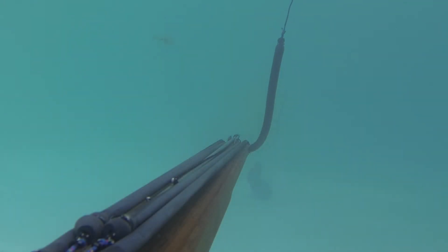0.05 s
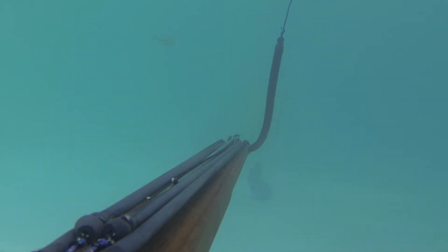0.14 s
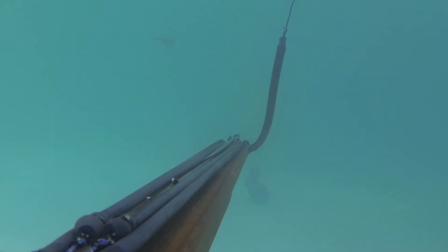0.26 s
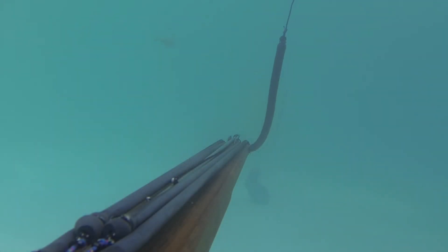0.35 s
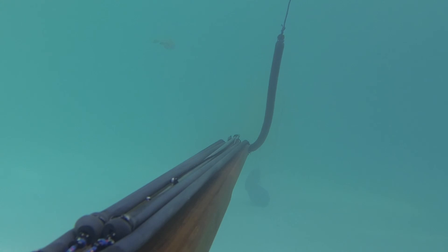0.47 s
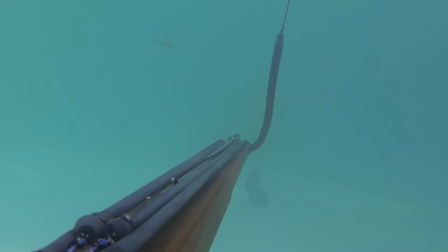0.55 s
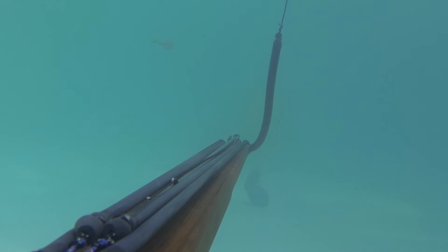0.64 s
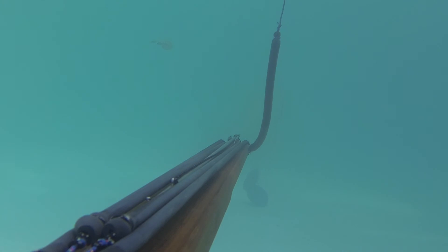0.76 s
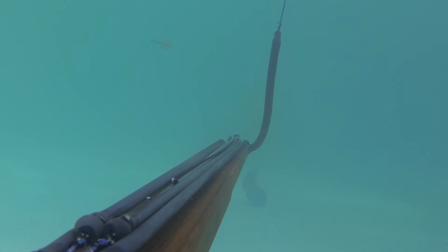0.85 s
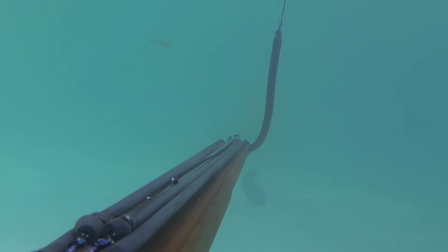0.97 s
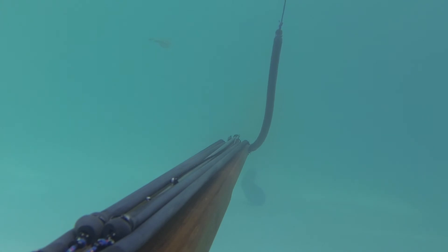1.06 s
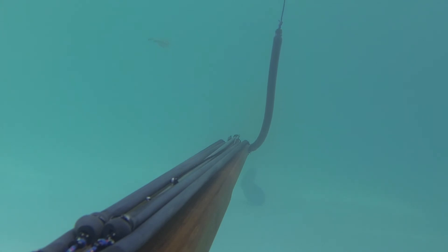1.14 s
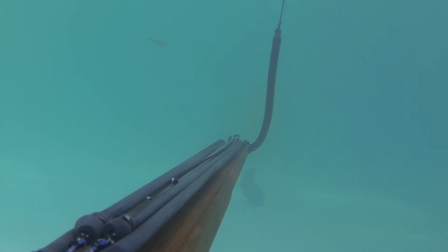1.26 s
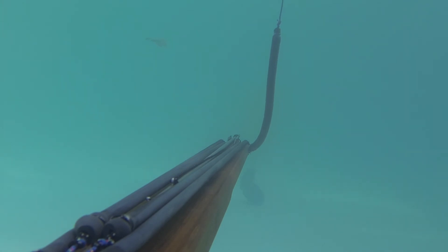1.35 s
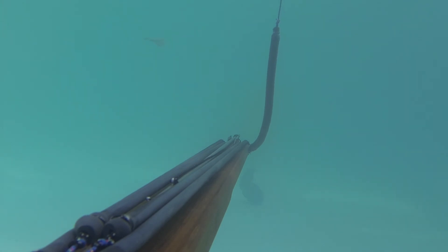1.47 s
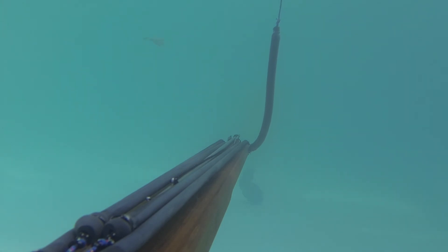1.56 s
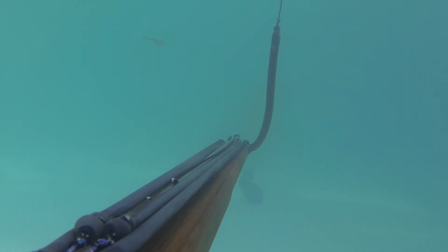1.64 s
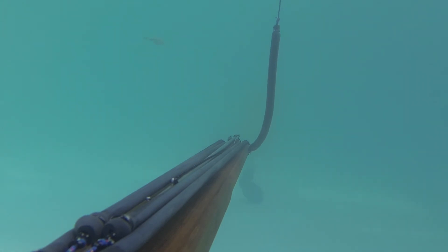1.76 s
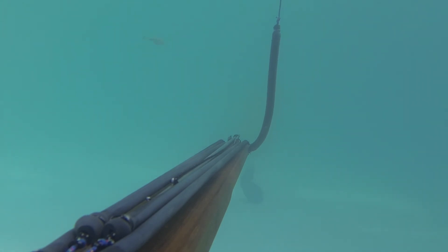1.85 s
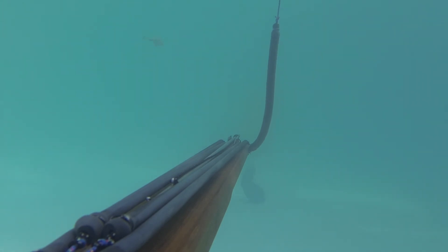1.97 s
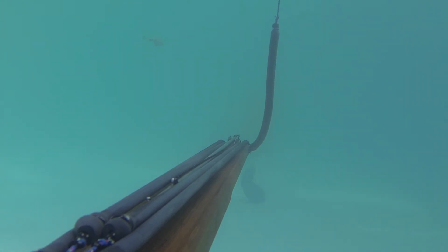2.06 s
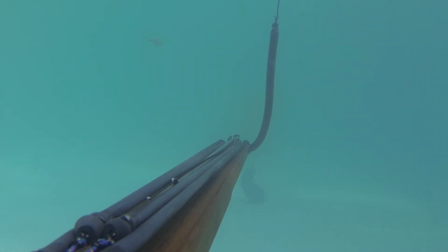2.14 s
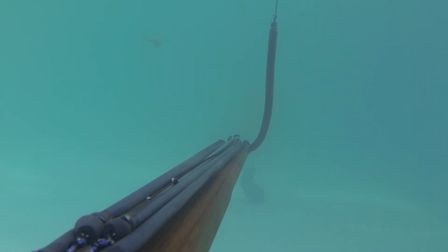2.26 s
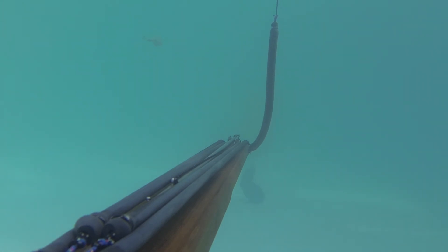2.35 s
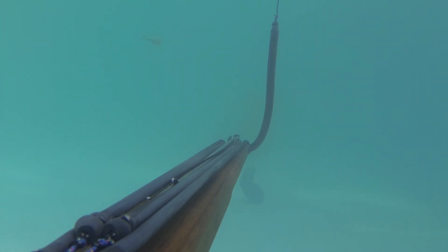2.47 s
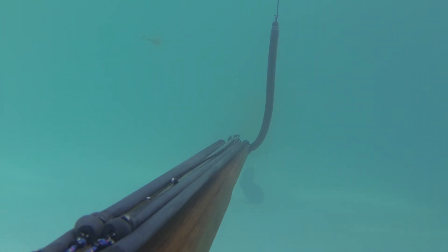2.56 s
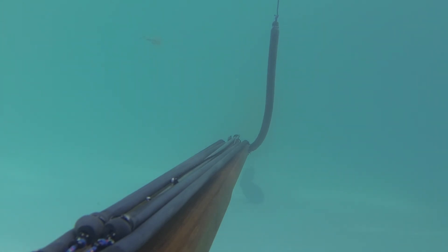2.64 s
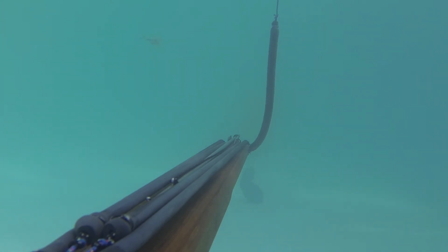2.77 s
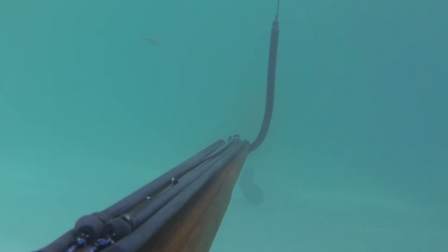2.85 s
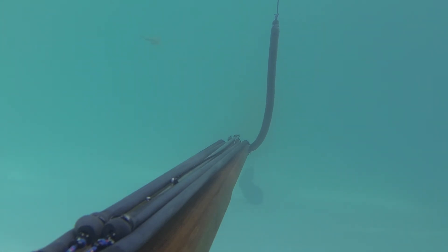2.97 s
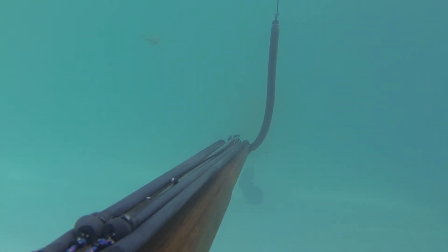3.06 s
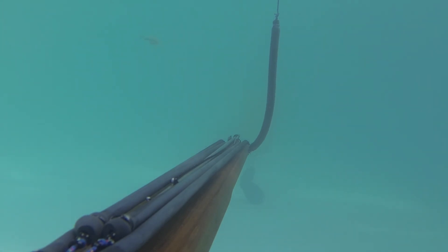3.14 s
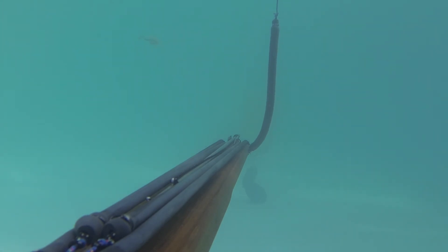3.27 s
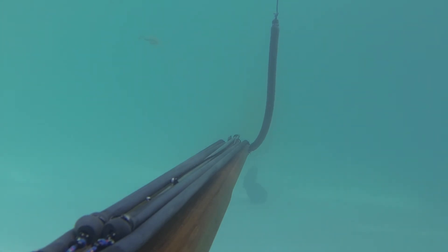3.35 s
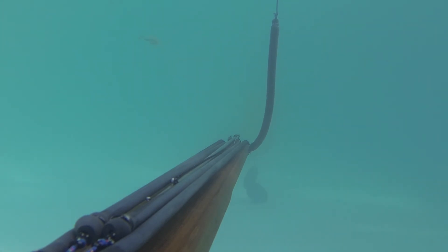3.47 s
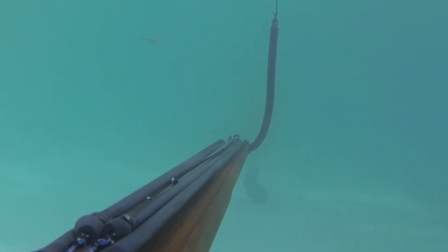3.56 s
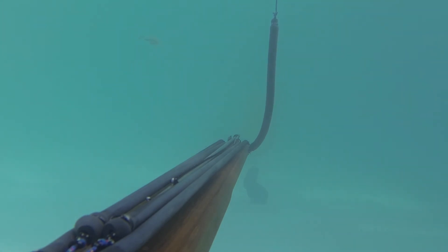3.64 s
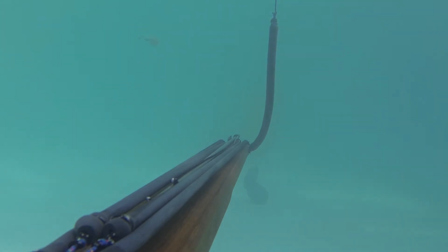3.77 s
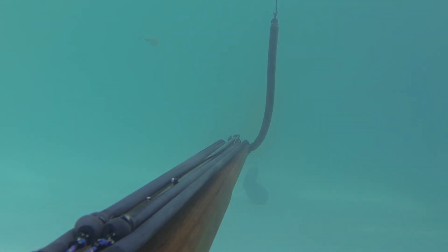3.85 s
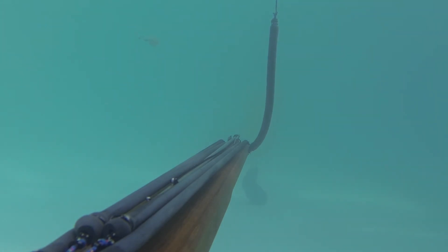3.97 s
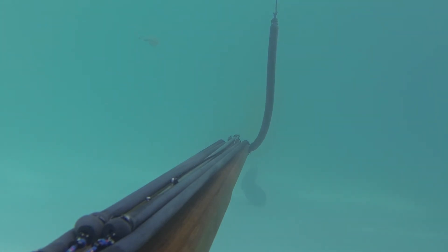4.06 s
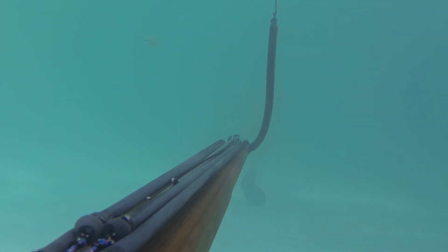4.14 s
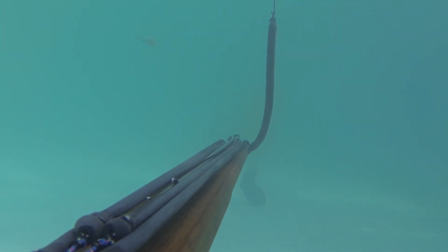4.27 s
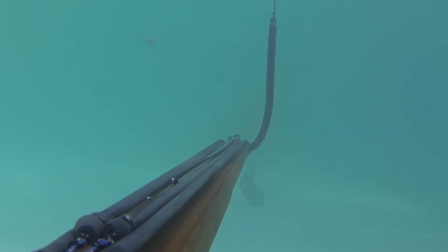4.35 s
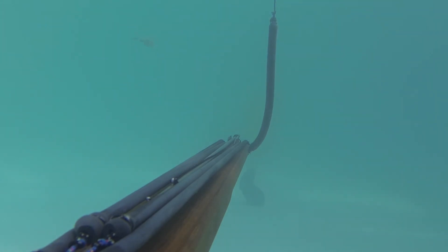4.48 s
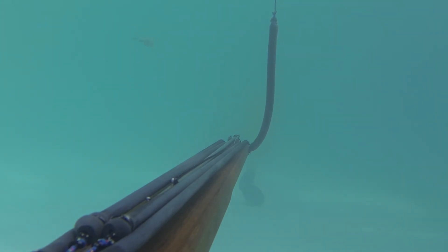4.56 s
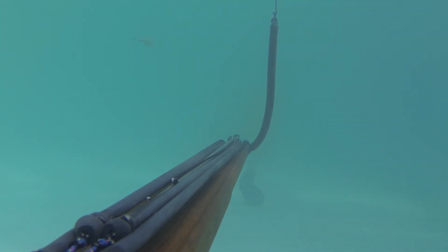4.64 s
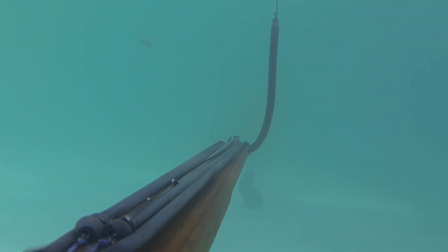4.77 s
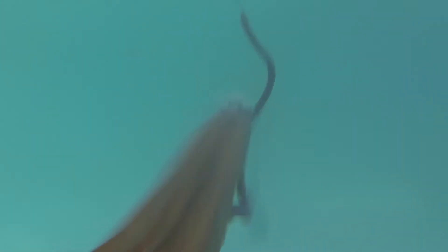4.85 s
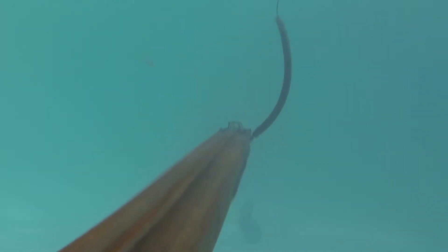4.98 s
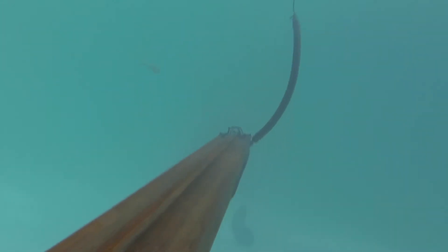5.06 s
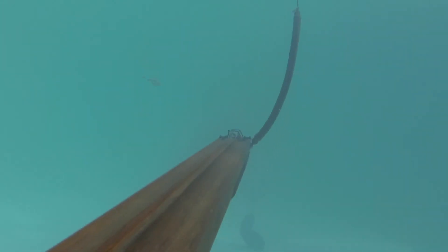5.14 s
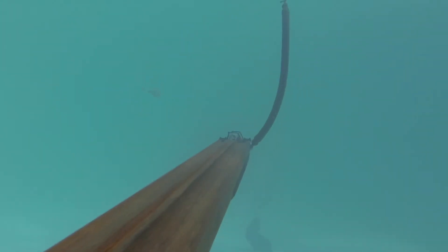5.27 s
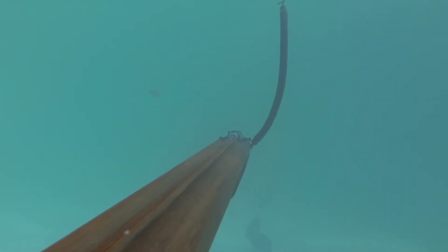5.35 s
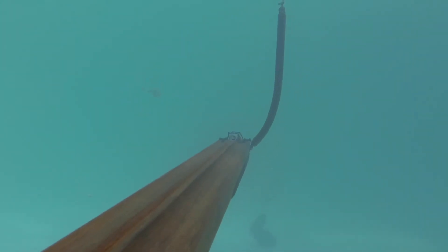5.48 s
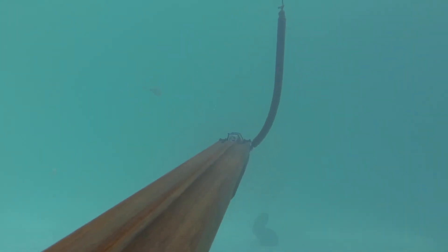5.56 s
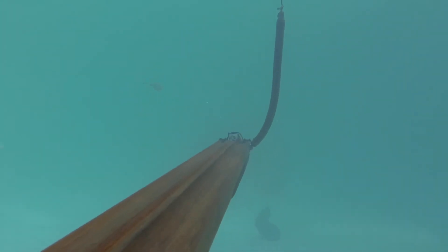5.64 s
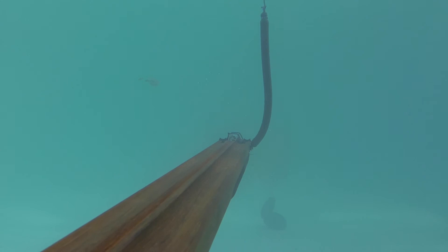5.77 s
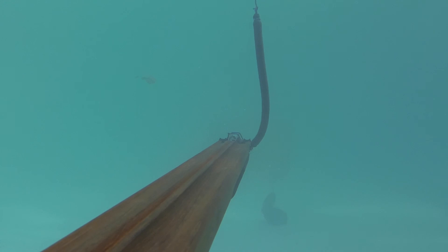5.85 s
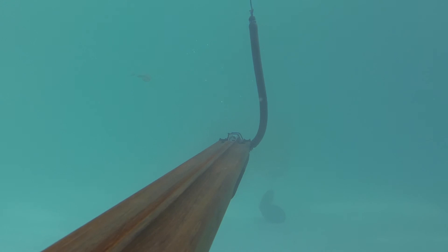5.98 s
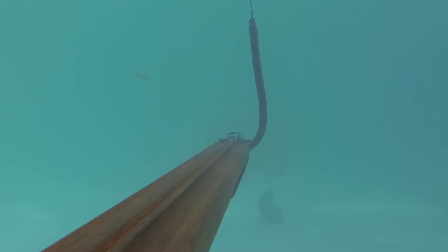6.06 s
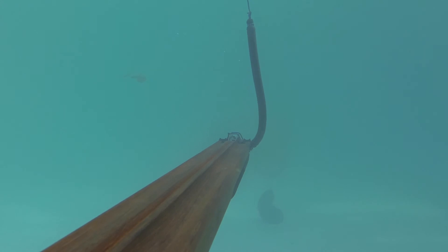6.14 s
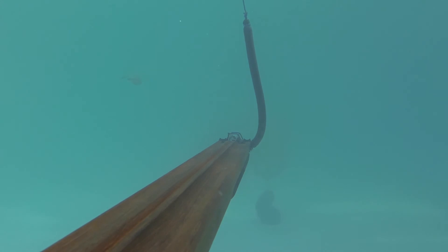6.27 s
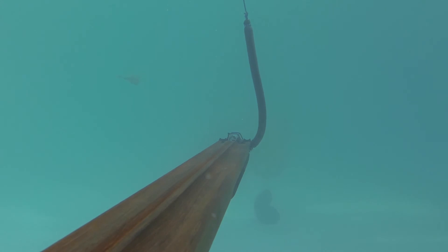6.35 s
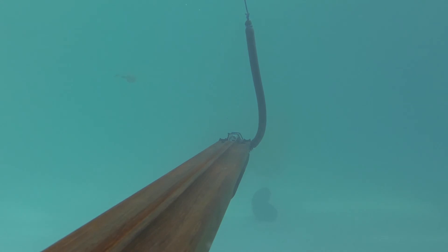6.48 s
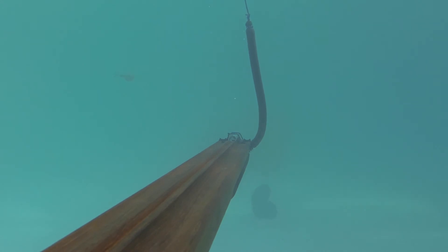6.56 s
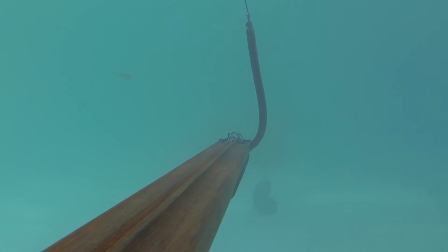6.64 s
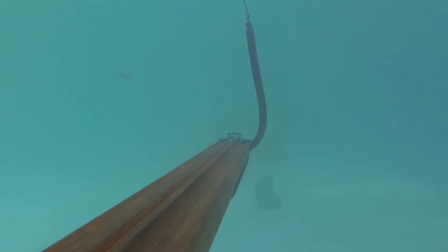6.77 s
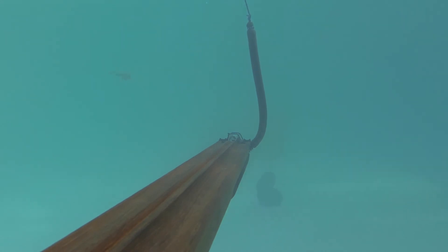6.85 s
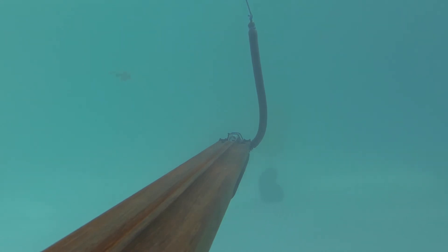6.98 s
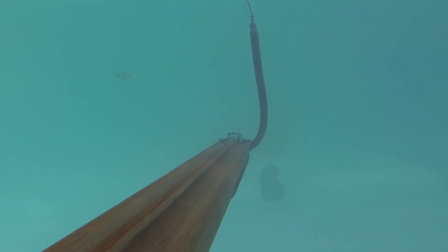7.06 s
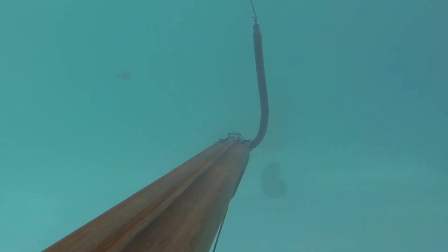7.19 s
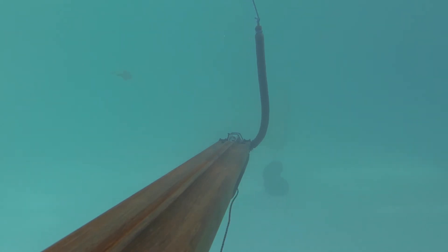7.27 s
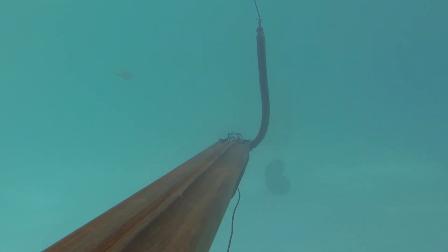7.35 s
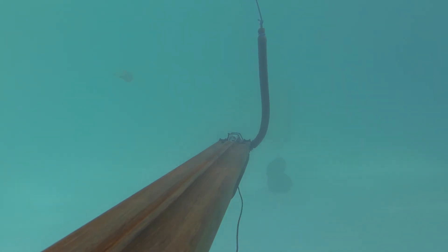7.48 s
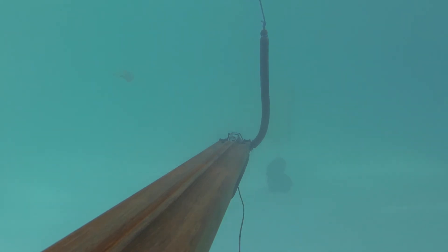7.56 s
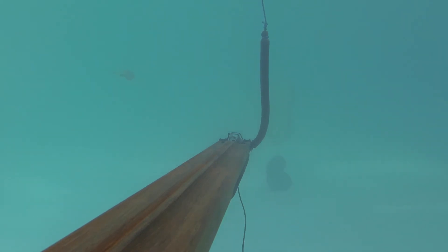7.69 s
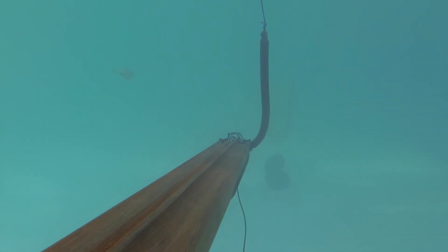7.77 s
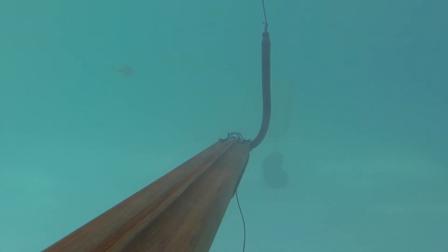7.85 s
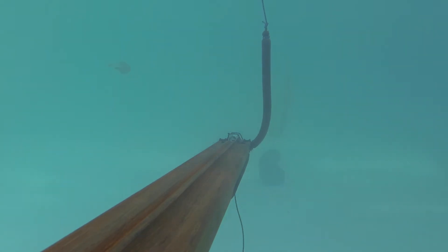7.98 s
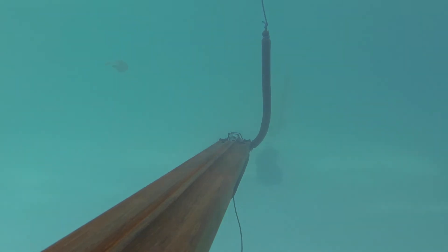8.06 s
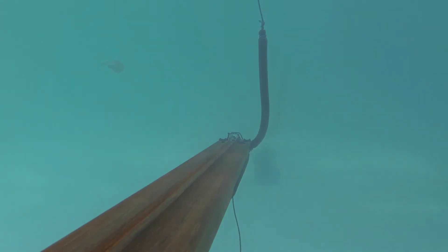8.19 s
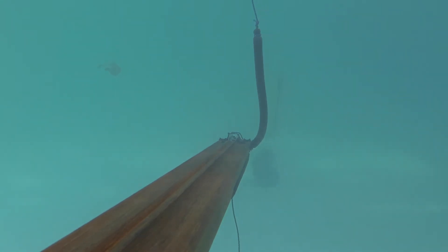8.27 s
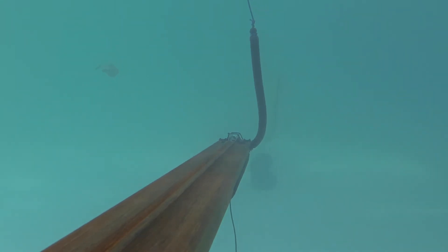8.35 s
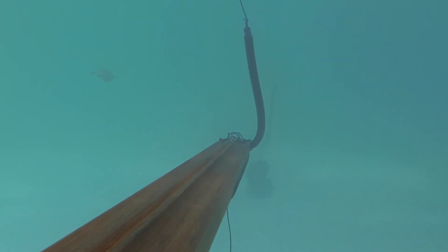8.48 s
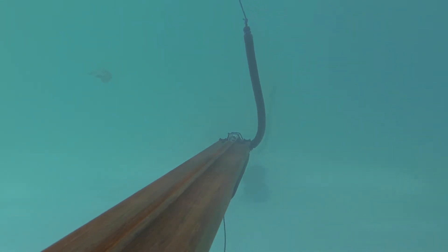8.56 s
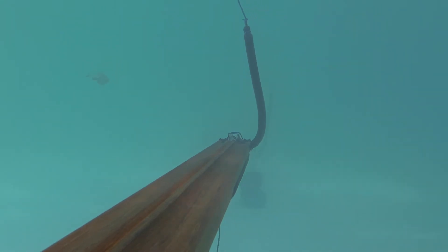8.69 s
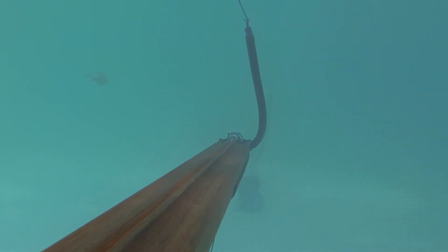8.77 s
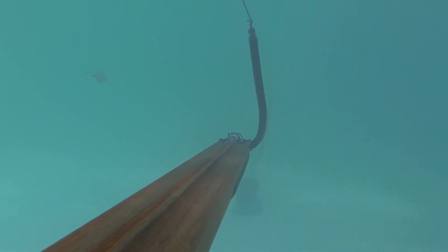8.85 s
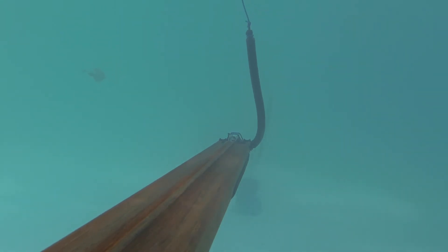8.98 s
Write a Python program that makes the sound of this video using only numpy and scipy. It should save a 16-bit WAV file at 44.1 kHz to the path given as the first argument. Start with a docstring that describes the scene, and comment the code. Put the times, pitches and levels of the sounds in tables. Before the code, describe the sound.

A steady underwater hiss with tiny bubble pings, then a hard double knock of a speargun firing, rattling scrapes, and later muffled bumps.

```python
"""Underwater speargun shot

A wooden speargun is fired under water, heard inside a sealed camera housing fixed to the stock.
Noise bursts ring stock and housing as knocks and scrapes; short pulses push, and a 23.65 Hz tone sways.
Band-filtered noise makes the line's rub and whirr, the swirls and the water's hiss and drone.
Damped sines ping as bubbles, short clicks tick, and faint steady sines hum."""
import sys
import numpy as np
from scipy.fft import rfft, irfft, next_fast_len
from scipy.io import wavfile
from scipy.ndimage import uniform_filter1d, map_coordinates

SR = 44100
rng = np.random.default_rng(int(sys.argv[2]) if len(sys.argv) > 2 else 0)


def wav_record(signal):
    """Record a signal, one row per channel, as 16-bit PCM in the file named by sys.argv[1]."""
    frames = np.transpose(np.atleast_2d(signal))
    bounded = np.clip(frames, -1, 1)
    # unit amplitude maps onto the largest positive 16-bit level
    quanta = np.round(bounded * 32767).astype(np.int16)
    wavfile.write(sys.argv[1], SR, quanta)


N = 397782
T = np.arange(N) / SR  # s


def amp(db):
    """Decibels to gain."""
    return 10 ** (np.asarray(db) / 20)


def unit(x):
    """x at rms 1."""
    return x / np.sqrt(np.mean(x ** 2) + 1e-20)


def curves(rows):
    """One value per sample for each column after the time."""
    s, *cols = np.transpose(rows)
    return [np.interp(T, s, c) for c in cols]


def during(rows):
    """1 between a curve's first and last time, with soft ends."""
    since_start = T - rows[0][0]
    until_end = rows[-1][0] + .02 - T
    return np.clip(np.minimum(since_start, until_end) / .03, 0, 1)


def wobble(rate):
    """A smooth random curve, rate knots a second."""
    knots = rng.standard_normal(int(N * rate / SR) + 4)
    return map_coordinates(knots, [T * rate])


def filtered(x, response):
    """x times a complex response of frequency."""
    m = next_fast_len(len(x) + 8192)  # room for the ringing to run out
    spectrum = rfft(x, m) * response(np.fft.rfftfreq(m, 1 / SR))
    return irfft(spectrum, m)[:len(x)]


def modes(table, hz):
    """Causal response of (centre_hz, width_hz, level_db) resonances, in alternating polarity."""
    total = 0
    for k, (centre, width, db) in enumerate(table):
        resonance = 1j * hz * width / (centre * centre - hz * hz + 1j * hz * width)
        total = total + (-1) ** k * amp(db) * resonance
    return total


def noise_through(response):
    """White noise through a response, at rms 1."""
    return unit(filtered(rng.standard_normal(N), response))


def add(out, s, piece):
    """Mix piece into out from s seconds."""
    part = out[round(s * SR):][:len(piece)]
    part += piece[:len(part)]


def water():
    """Hiss coloured by the cavity's resonances, a wavering drone and a faint hum."""
    # background levels before wavering: start_s, hiss_db, drone_db
    water_levels = [(0, -49, -43), (2.1, -49, -44), (3.7, -48.5, -47), (4.84, -48.5, -44), (5.03, -53, -63),
                    (5.83, -54, -56), (6.3, -48.5, -46.5), (7.3, -49, -50.5), (7.9, -51, -53),
                    (8.5, -48, -59), (9.02, -44, -48.5)]
    # smooth spectrum of the hiss, relative: pitch_hz, level_db (per Hz)
    hiss_spectrum = [(21, -25), (35, 10), (87, -12), (212, -7), (295, -5), (529, -24.5), (648, -16.5),
                     (1290, -35), (1620, -24.5), (1930, -42.5), (2360, -27), (2820, -38), (3200, -34),
                     (8000, -40), (15100, -50.5)]
    # cavity resonances that the hiss excites: centre_hz, width_hz, level_db
    cavity_bands = [(127, 33, 5), (415.7, 16, 3.5), (666, 165, 4), (760.3, 21, 9.5), (886, 78, -0.5),
                    (1130, 37, 1), (1470, 210, 1), (2230, 514, 4.5), (3196, 240, 4.5)]
    # low drone resonances: centre_hz, width_hz, level_db (before squaring)
    drone_bands = [(197.7, 17.9, 0.5), (220.4, 30.8, -1.5), (241.5, 11, -0.5)]
    # faint steady hum: pitch_hz, level_db (rms)
    hum_tones = [(480, -69.5), (600, -68), (959, -72.5)]
    calm_db, treble_hz = -50.5, 5000
    treble_dips = 1.6  # extra treble loss under the calm level, dB per dB

    hiss_db, drone_db = curves(water_levels)
    pitch_hz, spectrum_db = np.transpose(hiss_spectrum)

    def colour(hz):
        smooth = amp(np.interp(np.log(hz + 1), np.log(pitch_hz), spectrum_db))
        return smooth * (0.48 + np.abs(modes(cavity_bands, hz)))

    hiss = amp(hiss_db + 0.83 * wobble(6.8)) * noise_through(colour)
    dip = amp(treble_dips * np.minimum(hiss_db - calm_db, 0))
    treble = filtered(hiss, lambda hz: 1 / (1 + (treble_hz / (hz + 1)) ** 2))
    hiss = hiss + (dip - 1) * treble
    drone_noise = noise_through(lambda hz: modes(drone_bands, hz) ** 2)
    drone = amp(drone_db + 1.1 * wobble(9.7)) * drone_noise
    hum = 0
    for hz, db in hum_tones:
        phase = 2 * np.pi * hz * T + 0.21 * wobble(16.0)
        hum = hum + amp(db) * np.sqrt(2) * np.sin(phase)
    return hiss + drone + hum


def bubbles():
    """Each bubble rings as one damped tone; a swarm of mostly fainter ones fills the gaps."""
    # single pings: start_s, level_db (peak, before the soft onset and the decay), pitch_hz
    single_pings = [(.238, -48.5, 2610), (.38, -34.5, 1660), (.4444, -47, 1610), (.639, -42.5, 1650),
                    (0.835, -35.5, 1635), (1.1597, -36, 2510), (1.2106, -31.5, 1620), (1.8012, -33, 1620),
                    (1.918, -42.5, 1645), (2.0086, -47, 1200), (2.12, -45.5, 3230), (2.176, -38, 2540),
                    (2.587, -42, 1670), (2.646, -43.5, 1635), (2.726, -45, 1610), (2.9, -44.5, 2590),
                    (2.9457, -47, 1250), (3.0838, -43, 1820), (3.6115, -38, 2460), (3.7526, -45.5, 1675),
                    (4.067, -45, 2280), (4.203, -48, 1940), (4.323, -42, 1534), (4.6223, -41.5, 1530),
                    (4.7475, -42.5, 2400), (6.2047, -40, 1050), (6.391, -41, 1072), (6.5465, -31, 2160),
                    (6.5855, -39.5, 2473), (7.1361, -43, 2294), (7.172, -39, 2450), (7.51, -36.5, 1510),
                    (7.6276, -43, 3180), (7.934, -36.5, 1630), (8.2766, -38.5, 2355), (8.397, -23.5, 3070)]
    t60_at_1khz, shorter = 0.077, 0.67  # s; higher pings die sooner by this power
    t = T[:SR // 5]

    def ping(db, hz, t60):
        decay = amp(db - 60 * t / t60)
        onset = 1 - np.exp(-t / 0.00066)
        return decay * onset * np.sin(2 * np.pi * hz * t)

    out = np.zeros(N)
    for s, db, hz in single_pings:
        add(out, s, ping(db, hz, t60_at_1khz * (1000 / hz) ** shorter))
    for when, pitch, size in rng.random((1500, 3)):
        db = -54 - 3 * np.log(size + .04) - 13 * pitch
        add(out, when * T[-1], ping(db, 1100 * 5.5 ** pitch, .03 - .018 * pitch))
    return out


def rumble():
    """Water swirling round the moving housing: low noise that swells fast and sinks more slowly."""
    # swirls: strongest_s, level_db (at the strongest point)
    swirls = [(4.921, -25.5), (8.42, -34.5), (8.8, -35)]
    rise_db_per_s, fall_db_per_s = 259, 57.5
    level = 0
    for s, db in swirls:
        level = level + amp(db + np.minimum(rise_db_per_s * (T - s), fall_db_per_s * (s - T)))
    return level * noise_through(lambda hz: modes([(56.7, 29, 0)], hz) ** 2)


def sway():
    """The mount flexes like a spring: idle trembling, and a slightly lopsided low tone after shoves."""
    # sway of the camera on its mount: start_s, level_db (rms of the fundamental)
    sway_levels = [(0, -45), (.17, -30.5), (.3, -50), (2.1, -42), (2.4, -40), (3.8, -53.5), (4.4, -34.5),
                   (4.8, -56), (5.0, -19.5), (5.2, -16), (5.45, -12.5), (5.62, -18), (5.98, -25),
                   (6.3, -38.5), (7.1, -44.5), (7.84, -36), (8.05, -47), (8.14, -34), (8.27, -40.5),
                   (8.44, -25), (8.74, -21.5), (8.83, -13.5), (9.02, -18)]
    sway_hz = 23.65
    trembling = amp(-52) * noise_through(lambda hz: modes([(23.1, 5, 0)], hz) ** 2)
    phase = 2 * np.pi * sway_hz * T
    # weak overtones make the swing lopsided
    tone = np.sin(phase) + amp(-29.0) * np.cos(2 * phase) + amp(-35.5) * np.sin(3 * phase)
    return trembling + np.sqrt(2) * amp(curves(sway_levels)[0]) * tone


def drag():
    """Uneven friction of the line keeps a few bands of the stock ringing, with a narrow whirr."""
    # two spells of line dragging over the stock, each: start_s, level_db (rms)
    drag_spells = [
        [(5.03, -43), (5.16, -73), (5.38, -57), (5.46, -44), (5.59, -60), (5.67, -45.5), (5.86, -39),
         (5.94, -50.5), (6.15, -53), (6.3, -72.5)],
        [(7.4, -68), (7.53, -52), (7.75, -51.5), (8.3, -53), (8.55, -66), (8.735, -51), (8.82, -53),
         (9.02, -49.5)],
    ]
    # ringing bands of the rub: centre_hz, width_hz, level_db
    rub_bands = [(310, 34, -7), (727, 67, 2), (1100, 20, -6.5), (1513, 90, 8), (1617, 74, 12),
                 (2280, 550, -16.5), (3310, 220, -18.5)]
    # whirr once the line is out: start_s, level_db (rms)
    whirr_levels = [(5.9, -70.5), (6.3, -56), (7.4, -62), (8.1, -69), (8.4, -66)]
    level = sum(amp(curves(rows)[0]) * during(rows) for rows in drag_spells)
    friction = rng.standard_normal(N) * amp(3.2 * wobble(55))
    rub = unit(filtered(friction, lambda hz: modes(rub_bands, hz)))
    whirr = noise_through(lambda hz: modes([(727.5, 50, 0)], hz) ** 2)
    whirr_level = amp(curves(whirr_levels)[0]) * during(whirr_levels)
    return level * rub + whirr_level * whirr


def ticks():
    """An uneven run of single dry clicks just after the shot, during the low sway."""
    from_s, to_s, ticks_per_s = 5.035, 5.39, 62
    scatter = .25  # standard deviation as a share of the gap
    peak_db, spread_db = -41.5, 3.5
    t = T[:SR // 500]
    click = np.sin(2 * np.pi * 2200 * t) * np.exp(-t / .00013)
    click = click / click.max()
    out = np.zeros(N)
    for k, (shift, size) in enumerate(rng.standard_normal((40, 2))):
        s = from_s + (k + scatter * shift) / ticks_per_s
        if s < to_s:
            add(out, s, amp(peak_db + spread_db * size) * click)
    return out


def jolts():
    """Pushes such as recoil press the housing in or out for a few milliseconds: one-sided pressure pulses."""
    # slow pushes on the housing: centre_s, size (signed, full scale = 1), width_s
    pushes = [(4.858, -0.17, 0.0047), (4.92, -0.41, 0.0017), (4.929, 0.31, .005), (5.001, -0.25, 0.0021),
              (5.03, 0.11, 0.0044), (5.051, -0.28, 0.0053), (8.654, 0.33, 0.0013), (8.798, -0.13, .006)]
    return sum(size * np.exp(-np.abs((T - s) / width) ** 1.9) for s, size, width in pushes)


def knocks():
    """Rough contact noise under each blow's envelope rings the stock and each part of the housing."""
    # trigger, bands, shaft and other knocks and scrapes: start_s, held_s, t60_s (of the push at 1 kHz),
    # stock_hz, stock_db, rail_db, shell_db (rms over the contact), treble_db (relative to the shell)
    blows = [(.02, 0.038, .05, 604, -48, -55, -50.5, -16),
             (.058, 0.063, 0.051, 468, -34, -42, -40.5, -16.5),
             (.105, 0.049, 0.089, 535, -34, -44, -44, -15),
             (0.141, 0.036, 0.065, 460, -36.5, -52, -47, -16),
             (4.851, 0.0057, 0.052, 563, -14, -22.5, -28, -9),
             (4.862, .125, 0.055, 540, -45, -45, -42, -12.5), (4.877, 0.013, .028, 500, -36, -44, -35, -14),
             (4.89, .0057, 0.029, 605, -45, -52, -28, -13), (4.905, 0.005, .01, 600, -24, -35, -23, -16),
             (4.911, .0029, 0.0033, 616, -10.5, -15, -6.5, -4.5),
             (4.927, 0.0055, .015, 510, -50, -47, -46, -9.5),
             (4.944, 0.011, 0.022, 572, -31, -30, -26, -25.5),
             (4.953, 0.0046, 0.032, 590, -20.5, -20, -24, -20),
             (4.963, .01, 0.018, 550, -18.5, -38, -13, -11.5),
             (4.976, 0.0096, .075, 614, -29.5, -39, -33, -9), (5, 0.0021, 0.025, 488, -45, -53, -46, -11),
             (5.029, 0.0087, 0.37, 474, -32.5, -49, -44.5, -20),
             (5.124, 0.0024, 0.11, 480, -37, -52, -57, -17),
             (5.184, 0.0039, 0.081, 430, -50, -47, -45.5, -19),
             (5.386, .026, .085, 447, -40, -39.5, -30, -28.5),
             (5.419, 0.0017, .24, 630, -32.5, -29, -34.5, -19.5),
             (5.487, 0.013, 0.28, 643, -51.5, -36, -30, -24),
             (5.551, 0.0096, 0.046, 560, -54, -38, -46.5, -7.5),
             (5.616, 0.0041, 0.02, 715, -48, -26, -21, -18.5),
             (5.624, 0.00088, 0.087, 700, -36, -13, -22, -32.5),
             (5.66, 0.0042, 0.11, 475, -37.5, -39.5, -33, -35),
             (5.685, 0.01, 0.23, 675, -40.5, -45, -48, -9.5),
             (5.77, 0.046, 0.095, 470, -49.5, -47, -44, -29.5),
             (5.81, 0.012, 0.26, 693, -45.5, -51, -42, -19),
             (5.855, 0.0163, 0.15, 544, -52.5, -48, -37, -16),
             (8.083, 0.002, 0.091, 430, -35, -46, -42, -8),
             (8.137, 0.0023, 0.084, 700, -44.5, -53, -45.5, -9.5),
             (8.191, 0.0016, 0.097, 700, -38.5, -50.5, -40.5, -11),
             (8.361, .026, 0.13, 640, -34.5, -33.5, -37, -12.5),
             (8.393, 0.0098, 0.22, 630, -33, -36.5, -34.5, -6),
             (8.432, 0.017, 0.029, 630, -38.5, -47.5, -41, -18.5),
             (8.481, .0042, .033, 610, -55, -78, -60, 0.5), (8.536, .012, .04, 700, -62, -66, -58.5, -1),
             (8.572, 0.015, 0.051, 705, -43.5, -48, -47, -14),
             (8.606, 0.0086, 0.049, 613, -40, -49, -46, -25), (8.65, .027, 0.058, 616, -24, -40, -31, -12),
             (8.647, 0.0044, 0.068, 523, -24, -41, -36, -13),
             (8.689, 0.025, 0.12, 570, -26, -31.5, -31, -15), (8.722, .035, 0.043, 596, -40, -54, -50.5, 1),
             (8.778, .012, .1, 646, -37.5, -39, -31.5, -11.5),
             (8.749, 0.032, 0.23, 608, -25.5, -44, -30, -14),
             (8.809, 0.024, 0.9, 604, -35, -52, -49.5, -11)]
    # ringing parts: barrel, rail, shell, lens port, clips, each: centre_hz, width_hz, level_db
    housing_parts = [
        [(155.7, 83, -11.5), (312, 20, 6.5)],
        [(1077, 78, 0)],
        [(1466, 113, 2.5), (1680, 113.5, 3.5), (2265, 160, -14)],
        [(2603, 210, -12), (3247, 140, 5.5)],
        [(4540, 1800, -1), (5417, 2900, -2.5), (7450, 1000, -12.5), (11090, 2400, -23)],
    ]
    # hiss of the rubbing faces: centre_hz, width_hz, level_db
    fizz_band = [(10000, 9000, 0)]
    rise_s, rise_share = .001, .16  # build-up time, plus this share of the held time
    barrel_offset_db, barrel_db_per_s = 1, -260  # over the stock: short blows ring it, long rubs hardly
    port_offset_db, clips_offset_db, clips_steeper = -1.1, -11.5, 1.3  # how they share the treble
    fizz_offset_db, fizz_db_per_s, fizz_full_s = -18, 300.5, .035  # grows with held time up to this

    out, t = np.zeros(N), T[:SR // 3]
    for s, held, t60, stock_hz, stock_db, rail_db, shell_db, treble_db in blows:
        rise = rise_s + rise_share * held
        after = np.clip(t - rise - held, 0, None)  # seconds since the contact ended
        barrel_db = stock_db + barrel_offset_db + barrel_db_per_s * held
        port_db = shell_db + port_offset_db + treble_db
        clips_db = shell_db + clips_offset_db + clips_steeper * treble_db
        fizz_growth_db = fizz_db_per_s * min(held, fizz_full_s)
        fizz_db = shell_db + clips_offset_db + treble_db + fizz_offset_db + fizz_growth_db

        contact = rng.standard_normal(len(t)) * np.clip(t / rise, 0, 1) ** 1.5
        # the surfaces stick and slip, so the push comes in uneven grains
        grains = np.repeat(rng.standard_normal(len(t) // 100 + 1), 100)[:len(t)]
        contact *= amp(3.3 * uniform_filter1d(grains, size=60))
        contact *= 1 + 1.1 * np.exp(-((t - rise) / 0.0011) ** 2)  # accent as the build-up ends
        # after the contact the ringing is damped too, more slowly than the push at 1 kHz
        damping = amp(-60 * after / (3.3 * t60))
        # the stock's note depends on where it is touched
        stock = [(stock_hz, 90, 0), (stock_hz * 1.25, 120, -8)]
        parts = housing_parts + [stock, fizz_band]
        levels_db = [barrel_db, rail_db, shell_db, port_db, clips_db, stock_db, fizz_db]
        for part, db in zip(parts, levels_db):
            centre_hz = part[-1][0]

            def response(hz):
                lowpass = 1 / (1 + 1j * hz / centre_hz) ** 2
                highpass = 1j * hz / (centre_hz / 2 + 1j * hz)
                return modes(part, hz) * lowpass * highpass

            life = t60 * (1000 / centre_hz) ** 1.48  # high parts die sooner
            treble_fade_db = 33.0 * t * np.log2(1 + centre_hz / 2000)
            push = contact * amp(-60 * after / life - treble_fade_db)
            ring = damping * filtered(push, response)
            # total energy is spread over the rise, the held part and 4 ms more to set the level
            loud = np.sqrt(np.sum(ring ** 2) / SR / (rise + held + 0.004))
            add(out, s, amp(db) * ring / loud)
    return out


def scene():
    """Everything reaches the one microphone through the housing."""
    background = water() + bubbles() + rumble()
    gun = sway() + drag() + ticks() + jolts() + knocks()
    return (background + gun)[None]


def record(dry):
    """The input saturates towards full scale and keeps nothing above its band limit."""
    top_hz = 15300
    clipped = dry[0] / (1 + np.abs(dry[0]) ** 8) ** (1 / 8)
    return np.clip(filtered(clipped, lambda hz: hz < top_hz), -1, 1)[None]


dry = scene()
out = record(dry)
wav_record(out)
```